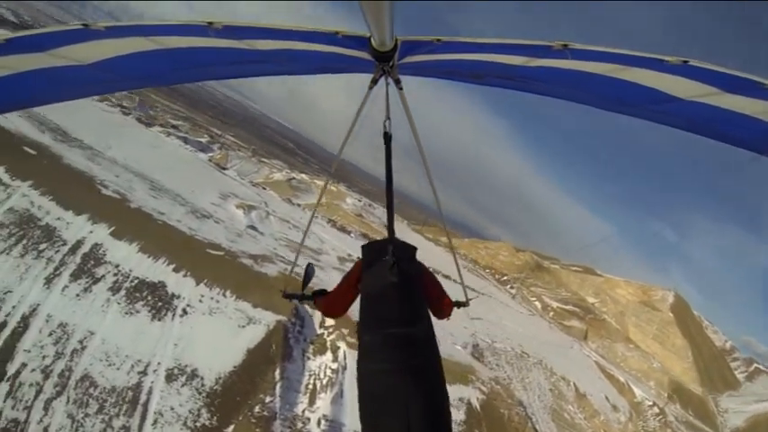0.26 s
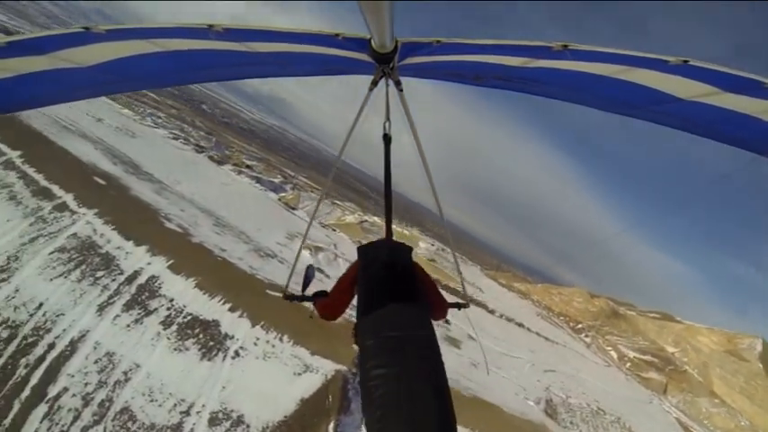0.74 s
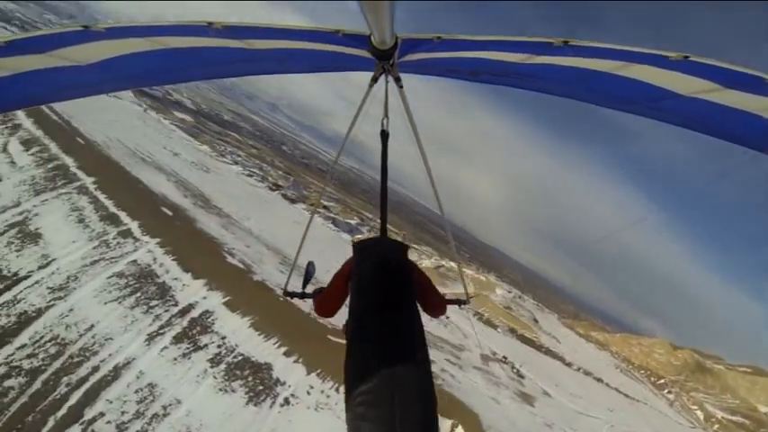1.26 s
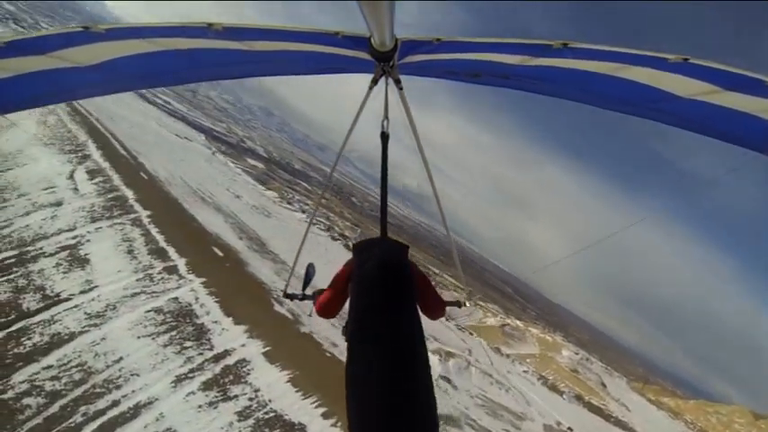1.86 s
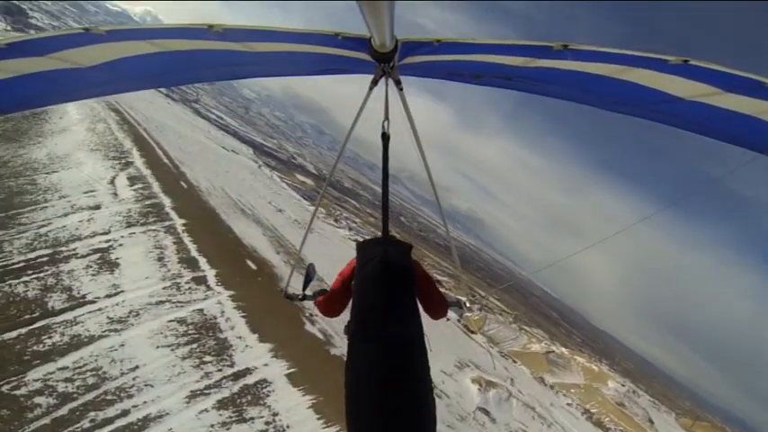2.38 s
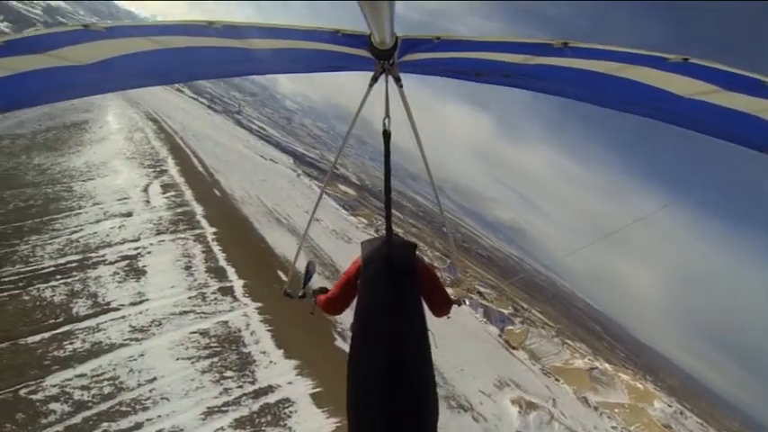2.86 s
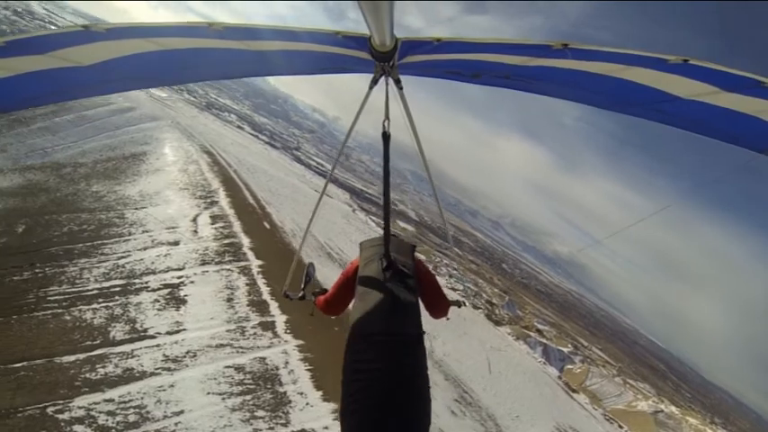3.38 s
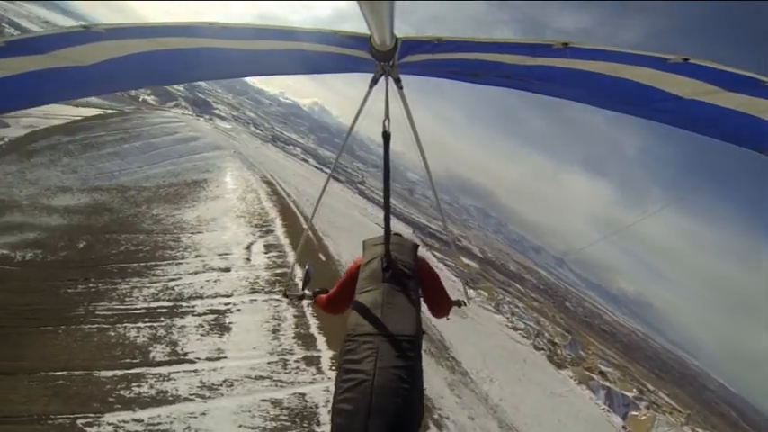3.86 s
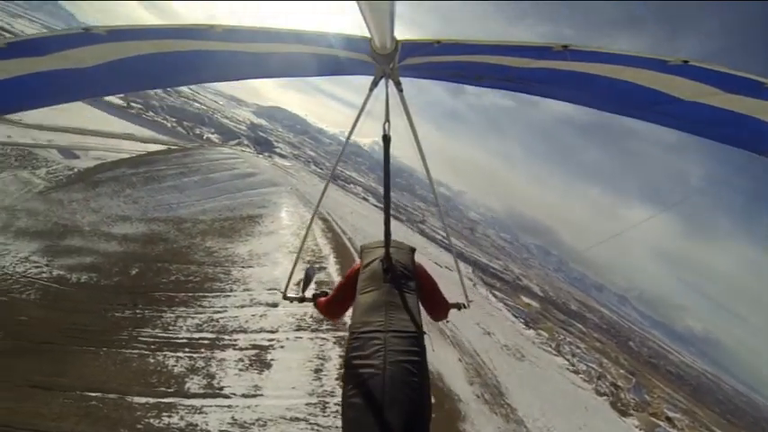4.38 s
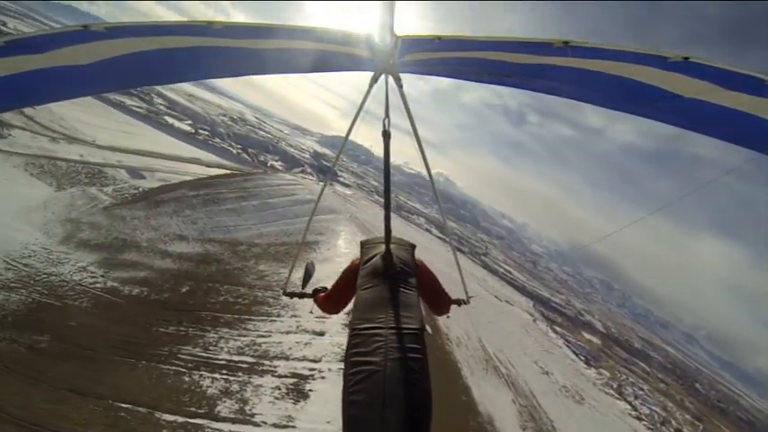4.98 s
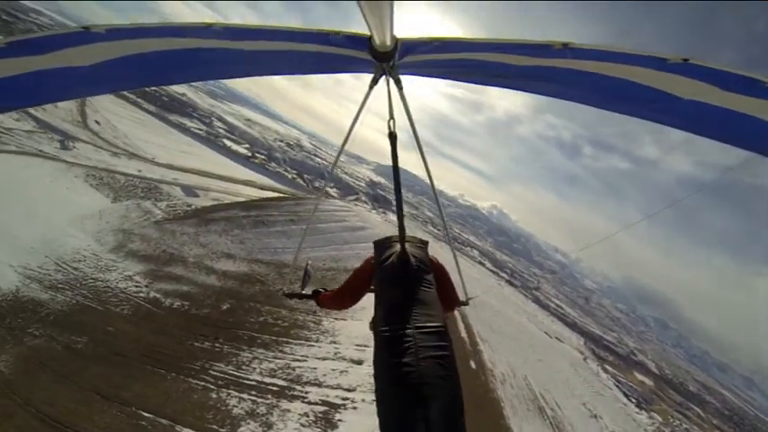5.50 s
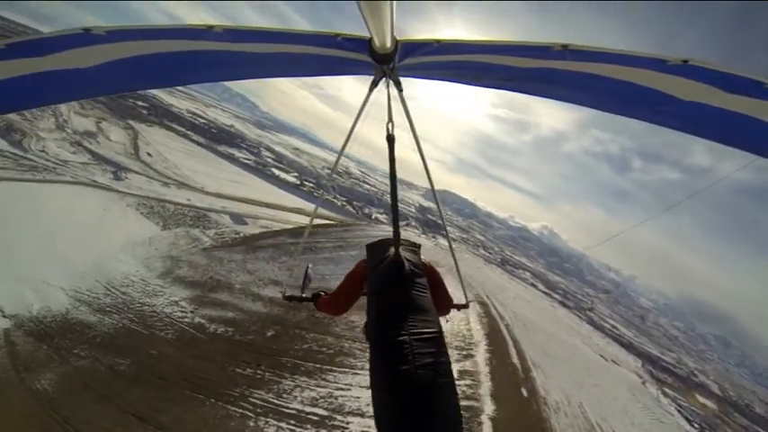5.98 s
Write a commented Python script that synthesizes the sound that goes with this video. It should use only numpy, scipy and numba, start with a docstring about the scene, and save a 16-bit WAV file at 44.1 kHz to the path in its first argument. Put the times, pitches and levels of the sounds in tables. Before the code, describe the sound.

Strong wind roars and buffets a closed camera housing on a hang glider in flight, with a wavering hum, faint whistle and knocking fittings.

```python
"""Hang glider in fast air

A camera in a closed housing rides on the keel: wind roars through the shell, the mount buzzes, an edge whistles,
a wire sings, the frame hums, fittings knock, and gusts and small eddies slap the microphone port.
Turbulence is shaped noise, wire and hum are drifting sines, knocks are decaying modes, gusts are pressure pulses.
A limiter that moves in small steps ducks everything when the smoothed pressure is too high."""
import sys
import numpy as np
from scipy import signal
from scipy.fft import rfft, irfft
from scipy.io import wavfile
from scipy.ndimage import uniform_filter1d
from numba import njit

SR = 44100
rng = np.random.default_rng(int(sys.argv[2]) if len(sys.argv) > 2 else 0)


def wav_out(sig):
    """Save sig, one row per channel (or a flat mono array), as 16-bit PCM at SR to the path in sys.argv[1]."""
    wavfile.write(sys.argv[1], SR, np.round(np.clip(np.atleast_2d(sig).T, -1, 1) * 32767).astype(np.int16))


N = 275625  # length in samples


def gain_of(db):
    """Logarithmic level: converts decibels to an amplitude factor."""
    return 10 ** (np.asarray(db) / 20)


def evened(x):
    """Normalization: scales a signal to rms 1."""
    return x / np.sqrt(np.mean(x ** 2) + 1e-20)


def column(table, index):
    """Linear interpolation: one column of a time table at every sample."""
    return np.interp(np.arange(N) / SR, [row[0] for row in table], [row[index] for row in table])


def add(mix, start_s, sound):
    """Superposition: mixes a sound in at its start time."""
    part = mix[max(round(start_s * SR), 0):][:len(sound)]
    part += sound[:len(part)]


def resonate(x, hz, width):
    """Resonance by heterodyning: shifts hz down to zero, smooths twice, and shifts back."""
    turn = np.exp(2j * np.pi * np.cumsum(hz * np.ones(len(x))) / SR)
    r = np.exp(-np.pi * width / SR)
    smooth = signal.lfilter([(1 - r) ** 2], [1, -2 * r, r ** 2], x * turn.conj())
    return 2 * (turn * smooth).real


def wander(hz):
    """Low-passed noise: a random curve of rms 1 and mean zero, falling off above hz."""
    bins = np.fft.rfftfreq(N, 1 / SR)
    lowpass = (bins > 0) / (1 + (bins / hz) ** 4)
    return evened(irfft(rfft(rng.standard_normal(N)) * lowpass, N))


def sing(hz, level_db, width, wobble_db, swell_db, drift, fuzz):
    """Vortex tone: a drifting sine that wobbles and swells, with a halo of narrow-band noise."""
    hz = hz * (1 + drift * wander(hz=9.8))
    sine = np.sqrt(2) * np.sin(2 * np.pi * np.cumsum(hz) / SR)
    tone = sine * gain_of(wobble_db * wander(hz=13))
    halo = evened(resonate(rng.standard_normal(N), hz, width))
    swell = gain_of(level_db + swell_db * wander(hz=5))
    return swell * evened(tone + fuzz * halo)


# Steady tones of the electronics. Each row: frequency in Hz, rms level in dB before the limiter.
WHINE_TONES = [(10645, -77), (10693, -86), (10741, -97), (11892, -97), (13714, -100)]


def whine():
    """Pure tones: thin steady sines from the camera's own circuits."""
    t = np.arange(N) / SR
    return sum(np.sqrt(2) * gain_of(db) * np.sin(2 * np.pi * hz * t) for hz, db in WHINE_TONES)


# Air over the shell. Each row: time in seconds, gain of the roar in dB.
AIR_FLOW = [(0.0, 5), (0.33, 4), (0.8, 3.5), (1.64, 2), (2.4, 0), (4.28, 2), (5.0, 1.5), (6.25, 2.5)]
# Spectrum of the turbulence. Each row: frequency in Hz, relative density in dB per Hz.
ROAR_SPECTRUM = [(8, -13.5), (25, 1.5), (60, -3.5), (91, -14.5), (170, -27.5), (330, -13.5), (420, -34),
                 (700, -32), (1250, -37), (2150, -37.5), (4300, -45), (5400, -54), (7500, -62.5),
                 (10000, -69), (14000, -80.5)]
ROAR_DB = -26.5  # broad noise, before the gain of the air
# Modes of housing and mount, shared with buzz and knocks. Each row: frequency in Hz, nominal width in Hz,
# level in dB under wind, relative level in dB under a knock, full ring time to -60 dB in seconds.
SHELL_MODES = [(215, 32, -55, 9, 0.19), (116, 88, -47.5, -22, 0.063), (247, 37, -65, -2, 0.092),
               (350, 49, -51.5, -2.5, 0.17), (404, 75, -59.5, -9, 0.06), (470, 105, -53, 3.5, 0.059),
               (593, 40, -70, 1.5, 0.033), (764, 55, -66.5, -2.5, 0.022), (925, 59, -56, -2, 0.036),
               (1032, 40, -58, -26, 0.071), (1600, 150, -67.5, -3, 0.05), (1750, 100, -75.5, -5.5, 0.068),
               (1866, 390, -57, -8.5, 0.025), (2034, 73, -80, -6.5, 0.032), (2150, 130, -63, -7.5, 0.026),
               (2346, 87, -75, -8, 0.045), (2976, 200, -63.5, -24, 0.023), (3780, 200, -76, -29, .03),
               (4225, 450, -66.5, -49, .023)]


def roar():
    """Turbulence and forced vibration: patchy, flickering noise plus the shell modes that it excites."""
    a, b, patches = rng.standard_normal((N // 256 + 5, 513, 3)).T
    # smooth over frequency, then over time
    patches = uniform_filter1d(patches, size=14, axis=0)
    patches = evened(uniform_filter1d(patches, size=10, axis=1))
    spectrogram = (a + 1j * b) * gain_of(1.4 * patches)
    noise = evened(signal.istft(spectrogram, nperseg=1024, noverlap=768)[1][:N])
    noise = noise * gain_of(0.97 * wander(hz=42.0))  # flickers across the whole band
    bins = np.fft.rfftfreq(N, 1 / SR)
    hz, density_db = np.transpose(ROAR_SPECTRUM)
    tilt = gain_of(np.interp(np.log(bins + 1), np.log(hz + 1), density_db))
    broad = irfft(rfft(noise) * tilt, N)
    modes = sum(gain_of(wind_db) * evened(resonate(noise, mode_hz, 1.93 * width))
                for mode_hz, width, wind_db, _, _ in SHELL_MODES)
    return gain_of(column(AIR_FLOW, index=1)) * (gain_of(ROAR_DB) * evened(broad) + modes)


BUZZ_DB, BUZZ_BURST_DB, BUZZ_BURST_HZ = -41, 5, 6.4  # middle level, rms depth and pace of its bursts


def buzz():
    """Forced resonance: noise shakes the first mode in the table, in bursts."""
    hz, width = SHELL_MODES[0][:2]
    shake = rng.standard_normal(N)
    bursts = gain_of(BUZZ_DB + BUZZ_BURST_DB * wander(hz=BUZZ_BURST_HZ))
    return bursts * evened(resonate(shake, hz, 2.0 * width))


# Edge whistle of the housing. Each row: time in seconds, central pitch in Hz, central level in dB.
WHISTLE_GLIDE = [(0, 1020, -48), (.35, 1045, -58), (.7, 1036, -47), (1.15, 986, -49.5), (1.25, 931, -47.5),
                 (2.5, 911, -46.5), (2.9, 931, -47), (3.4, 912, -52), (3.75, 930, -48), (4.1, 1016, -44.5),
                 (4.6, 953, -54), (4.78, 958, -43), (5.0, 942, -47.5), (5.35, 913.8, -44.5),
                 (5.65, 900, -49), (6.25, 1028, -58)]


def whistle():
    """Edge tone: noise through a narrow resonance that glides, wavers and flickers in level."""
    hz = column(WHISTLE_GLIDE, index=1) * (1 + 0.0097 * wander(hz=6.6))
    air = evened(resonate(rng.standard_normal(N), hz, width=70))
    return gain_of(column(WHISTLE_GLIDE, index=2) + 1.1 * wander(hz=21)) * air


# Strength of the singing wire. Each row: time in seconds, central level in dB.
WIRE_LEVEL = [(0.0, -31), (0.31, -63), (0.62, -27.5), (0.73, -33), (0.87, -26), (0.96, -45.5),
              (1.22, -22.5), (1.25, -32), (1.53, -27), (1.74, -44), (1.88, -39), (1.97, -65), (2.07, -50),
              (2.33, -37), (2.42, -50), (2.58, -25.5), (2.63, -42), (2.73, -26), (2.8, -40), (2.84, -29.5),
              (2.91, -37), (2.92, -48), (2.96, -43.5), (3.12, -26.5), (3.31, -47), (3.41, -25.5),
              (3.45, -36), (3.6, -28), (3.66, -45), (3.76, -22.5), (3.92, -35), (4.21, -26), (4.42, -34.5),
              (4.53, -23), (4.58, -32), (4.68, -27.5), (4.75, -49), (4.79, -23.5), (4.86, -36.5),
              (4.89, -24.5), (5.08, -35.5), (5.15, -23.5), (5.24, -22), (5.29, -39), (5.33, -32),
              (5.38, -45), (5.48, -26), (5.61, -33.5), (5.67, -23.5), (5.71, -36), (5.76, -28.5),
              (5.95, -30), (5.99, -53), (6.06, -29), (6.21, -52), (6.25, -50)]
# Pitch of the wire. Each row: time in seconds, central pitch in Hz.
WIRE_HZ = [(0, 314.7), (.45, 310.5), (.65, 305), (.9, 312.4), (1.08, 313.5), (1.2, 304.3), (1.3, 315),
           (1.4, 297.6), (1.6, 299.3), (2.0, 304), (2.4, 298), (2.8, 291.7), (3.15, 296), (3.5, 298.2),
           (3.8, 303), (4.3, 291.8), (4.55, 300.7), (5.0, 302.9), (5.25, 304), (5.5, 299), (5.85, 306.3),
           (6.25, 299.8)]


def wire():
    """Aeolian tone: a nearly steady sine with a little narrow-band noise around it."""
    return sing(column(WIRE_HZ, index=1), column(WIRE_LEVEL, index=1), width=27,
                wobble_db=0.44, swell_db=0.25, drift=.007, fuzz=0.25)


# Frame hum, driven by shed vortices. Each row: time in seconds, central level in dB, central pitch in Hz.
FRAME_HUM = [(0.0, -11.5, 51.27), (.15, -30, 51.31), (.33, -12, 49.26), (.47, -33.5, 49.7),
             (.62, -24, 49.99), (.8, -25, 49.97), (.95, -21.5, 54.63), (1.15, -24.5, 54.8),
             (1.3, -18, 54.77), (1.44, -12.5, 54.25), (1.58, -10, 54.16), (1.65, -23.5, 52.39),
             (1.74, -37.5, 52.47), (2.0, -24, 49.54), (2.2, -34, 48.15), (2.54, -13, 53.9),
             (2.76, -33.5, 53.74), (3.0, -16.5, 52.76), (3.15, -32.5, 51.4), (3.5, -19, 57.23),
             (3.7, -27, 52.88), (3.88, -18, 52.86), (4.25, -20.5, 56.58), (4.4, -25, 52.64),
             (4.55, -20, 54.16), (5.0, -36, 48.05), (5.35, -19.5, 49.6), (5.75, -22.5, 53.57),
             (5.92, -15, 52.5), (6.25, -28.5, 53.8)]


def hum():
    """Vortex-driven vibration: a low sine that drifts and wobbles more than the wire."""
    return sing(column(FRAME_HUM, index=2), column(FRAME_HUM, index=1), width=12,
                wobble_db=3.5, swell_db=0.98, drift=.025, fuzz=0.18)


CRACK_DB, CRACK_PER_HARDNESS = -32, 2.52  # harder blows crack louder
RATTLE_S, CRACK_S = 0.00085, 0.0012  # decay time constants
CONTACT_S, SOFTNESS_DB = 0.00036, 0.86  # onset time at hardness 0, and its lengthening per step of softness
# Fittings striking the frame. Each row: start in seconds, peak in dB before the limiter, hardness in dB per
# octave, weight on the lowest modes in dB, relative level of the rebound in dB, delay of the rebound in ms,
# share of the full ring time from 0 to 1.
FITTING_KNOCKS = [(0.056, -18.5, 8, -2, -1.5, 4.6, 0.6), (0.064, -18.5, 6, 16, -18, 8, 0.97),
                  (0.5264, -11.5, 1.5, -11.5, -17, 8.6, 0.88), (0.822, -24.5, -5, -3, 1, 8, 0.8),
                  (0.832, -15.5, -12, 7, -7, 9, 0.79), (0.84, -18, -8, -1, -12, 8.4, 0.63),
                  (0.873, -17.5, -11, 12, -10, 7.7, 0.96), (1.86, -15, -2, 5, 0, 9.2, 0.81),
                  (2.703, -22, 2, 1, -2, 7.2, 0.4), (3.018, -27.5, -3, -9, -7, 8, 1),
                  (4.137, -8.5, -8.5, -9, -6.5, 8.5, 0.97), (4.178, -8.5, -5, -2, -4, 8.5, 1),
                  (4.215, -8.5, -4.5, -2.5, 1, 6.5, 1), (4.254, -9, -4, 2, 1.5, 6.3, 1),
                  (4.277, -29.5, 24, -18, -19, 6.8, 0.8), (4.292, -13, -4.5, 2, 4, 8, 0.77),
                  (4.336, -14, -15.5, -16, -4, 6.3, 1), (4.375, -21.5, -10, -9, 4, 7.5, 1),
                  (5.345, -17, 10, 25, -1.5, 4.3, 0.58), (5.626, -17.5, -5.5, -11, -1, 5, 0.8),
                  (6.165, -15, -5, -7.5, 1, 5.7, 0.23)]


def knocks():
    """Modal impact: each blow rings all shell modes, a hard one the upper more; loose parts rattle and crack."""
    out, t = np.zeros(N), np.arange(SR // 5) / SR
    hz, _, _, mode_db, t60 = np.transpose(SHELL_MODES)
    mount = hz < 300  # the lowest modes
    flip = np.pi * (np.arange(len(hz)) % 2)[:, None]  # successive table modes start in opposite directions
    band = signal.butter(2, [2600, 4800], "band", fs=SR, output="sos")
    chance = rng.standard_normal((len(FITTING_KNOCKS), 3, len(hz)))
    grit = rng.standard_normal((len(FITTING_KNOCKS), 900))
    for row, (spread, detune, lag), loose in zip(FITTING_KNOCKS, chance, grit):
        start_s, peak_db, hard, weight_db, rebound_db, rebound_ms, share = row
        contact_s = CONTACT_S * gain_of(-SOFTNESS_DB * np.clip(hard, -8, 8))
        envelope = gain_of(-60 * t / (share * t60[:, None])) * (1 - np.exp(-t / contact_s))
        level = gain_of(mode_db + hard * np.log2(hz / 900) + weight_db * mount + 0.67 * spread)[:, None]
        mode_hz = (hz * (1 + 0.016 * detune))[:, None]
        ring = level * envelope * np.sin(2 * np.pi * mode_hz * t + 0.32 * lag[:, None] + flip)

        shell = ring[~mount].sum(0)
        rattle = loose * np.exp(-t[:len(loose)] / RATTLE_S)
        sound = shell + 0.044 * signal.fftconvolve(shell, rattle)[:len(t)]
        # the rebound only reaches the shell
        add(sound, rebound_ms / 1000, gain_of(rebound_db) * sound)
        sound = sound + ring[mount].sum(0)
        sound = sound / abs(sound).max()

        crack = signal.sosfilt(band, loose * np.exp(-t[:len(loose)] / CRACK_S))
        sound[:len(loose)] += gain_of(CRACK_DB + CRACK_PER_HARDNESS * hard) * crack
        add(out, start_s, gain_of(peak_db) * sound / abs(sound).max())
    return out


# Small eddies at the port. Each row: start in seconds, strength in dB before the pulse shape,
# length of the dip in ms (the rebound lasts as long again).
EDDY_POPS = [(0.061, -4.5, 3.1), (0.217, 2.5, 18), (0.929, 0, 14.6), (1.026, -3, 6.3), (3.4, -11, 14),
             (3.984, -2, 7.8), (4.286, 2.5, 7.9), (5.519, -0.5, 2.7), (5.936, 3.5, 6), (5.948, -3, 11),
             (5.964, -5, 4.4), (6.023, -2, 5.6), (6.032, -2, 5.6), (6.094, -16, 3.1), (6.166, -5, 2.8),
             (6.184, -6, 10)]


def pops():
    """Pressure pulse: a quick dip that rebounds more weakly."""
    out = np.zeros(N)
    for start_s, strength_db, dip_ms in EDDY_POPS:
        u = np.linspace(0, 2, round(2 * dip_ms * SR / 1000))  # dip until 1, rebound until 2
        swing = np.sin(np.pi * u) * np.sin(np.pi * u / 2) ** 0.74
        add(out, start_s, -gain_of(strength_db) * swing * np.exp(.6 - 2.1 * u))
    return out


MILD_GUSTS = 24  # weaker gusts at random moments
MILD_DB, MILD_SPREAD_DB, MILD_FALL_MS = -16, 0.5, 37  # middle level, largest deviation, middle fall time
# Hard gusts at the port. Each row: time of the collapse in seconds, nominal suction peak in dB,
# nominal pressure peak before it in dB, fall time from pressure to suction in ms.
HARD_GUSTS = [(0.135, -5.5, -17.5, 40), (0.205, -15.5, -3.5, 27), (0.919, -11, -6, 19.6),
              (1.028, -10, -4.5, 28), (1.915, -1, -23.5, 22.4), (2.598, -19, -7.5, 25.8),
              (2.854, -1.5, -30.5, 53), (2.916, -9.5, -3, 55), (3.19, -13.5, -6.5, 27),
              (3.263, -5.5, -7.5, 34), (3.405, -3, -19.5, 33), (3.492, -2.5, -9, 64), (3.597, -4, -10, 33),
              (3.792, -6.5, -14, 26.2), (3.992, -12, -12, 16), (4.543, -5, -9.5, 15),
              (5.396, -10, -10, 17.3), (5.522, 4.5, -13, 15.7), (5.637, 1.5, -8, 14.3),
              (5.721, -6.5, -9, 33.7), (5.903, -5, -6, 22.6), (6.106, -5, -10.5, 31), (6.171, -18, -3, 13)]


def gusts():
    """Eddy pressure: it builds, collapses into suction as an eddy leaves, and relaxes; the flanks are ragged."""
    out = np.zeros(N)
    when, suck, push, pace = rng.random((MILD_GUSTS, 4)).T * 2 - 1
    mild = zip((when + 1) * N / SR / 2, MILD_DB + MILD_SPREAD_DB * suck,
               MILD_DB + MILD_SPREAD_DB * push, MILD_FALL_MS * 2 ** pace)
    half = SR // 8  # samples on each side of the collapse
    t = np.arange(-half, half) / SR
    for collapse_s, suck_db, push_db, fall_ms in list(HARD_GUSTS) + list(mild):
        half_fall = fall_ms / 2 / 1000
        pressure = gain_of(push_db) * np.exp(-(np.minimum(t + half_fall, 0) / 0.039) ** 2)
        suction = -gain_of(suck_db) * np.exp(-(np.maximum(t - half_fall, 0) / 0.019) ** 2)
        step = .5 + .5 * np.tanh(t / (0.42 * half_fall))
        pulse = pressure * (1 - step) + suction * step
        skip = max(half - round(collapse_s * SR), 0)  # the part before time zero
        add(out, collapse_s - half / SR, pulse[skip:])
    return out * (1 + 0.099 * wander(hz=131.0) + 0.0099 * wander(hz=945))


def scene():
    """Superposition: the pressures of all sources sum at one microphone."""
    background = whine() + roar() + buzz() + whistle()
    return (background + wire() + hum() + knocks() + pops() + gusts())[None]


@njit
def duck(over_db, fall, rise):
    """Dynamic limiting: gain reduction chases any excess at one speed and lets go at a slower one."""
    out, now = np.zeros(len(over_db)), 0.
    for i in range(len(over_db)):
        now = min(now + fall, over_db[i]) if over_db[i] > now else max(now - rise, 0.)
        out[i] = now
    return out


EDGE_HZ = 15700  # upper edge of the passed band


def record(dry):
    """Filtering and limiting: weakens the slowest drift, limits in audible steps, then cuts the top band."""
    x = signal.sosfilt(signal.butter(1, 5.0, "high", fs=SR, output="sos"), dry[0])
    # excess of the smoothed pressure over -12 dB
    over_db = 20 * np.log10(abs(uniform_filter1d(x, size=200)) + 1e-9) + 12.0
    cut_db = duck(over_db, 2200. / SR, 62. / SR)  # speeds in dB per second over SR
    cut_db = uniform_filter1d(cut_db, size=150)
    # the gain is renewed at uneven ticks and in whole steps; each step leaves a faint click
    ticks = np.maximum.accumulate(np.arange(N) * (rng.random(N) < 7000 / SR))
    step_db = 0.35
    held_db = uniform_filter1d(step_db * np.round(cut_db[ticks] / step_db), size=3)
    x = x / gain_of(held_db)
    lowpass = signal.firwin(511, EDGE_HZ, window=("kaiser", 9), fs=SR)
    return signal.oaconvolve(x, lowpass, "same")[None]


dry = scene()
out = record(dry)
wav_out(out)
```